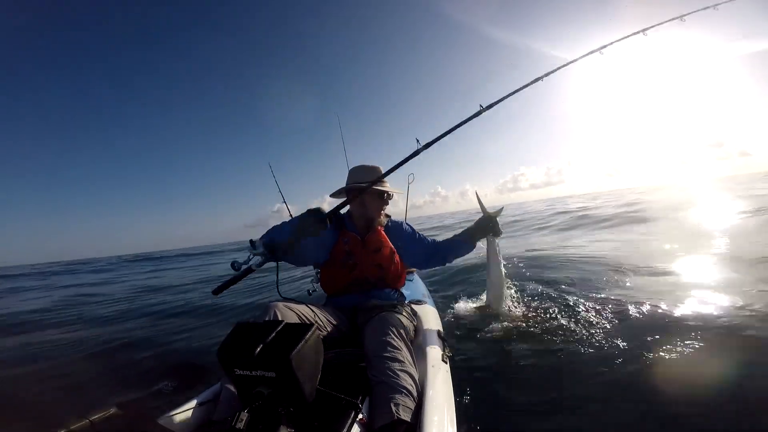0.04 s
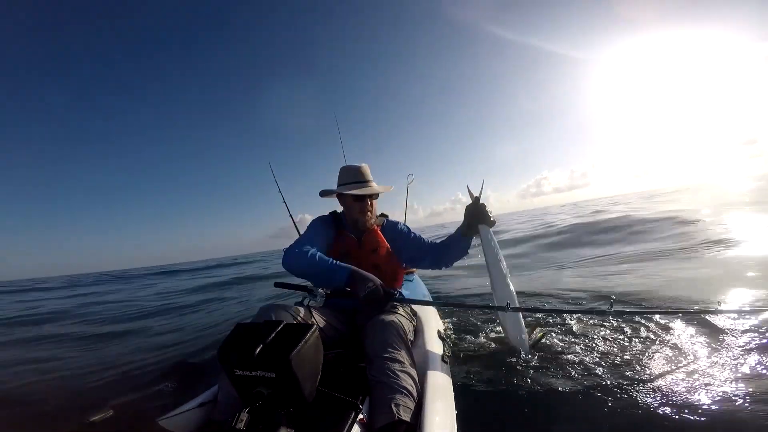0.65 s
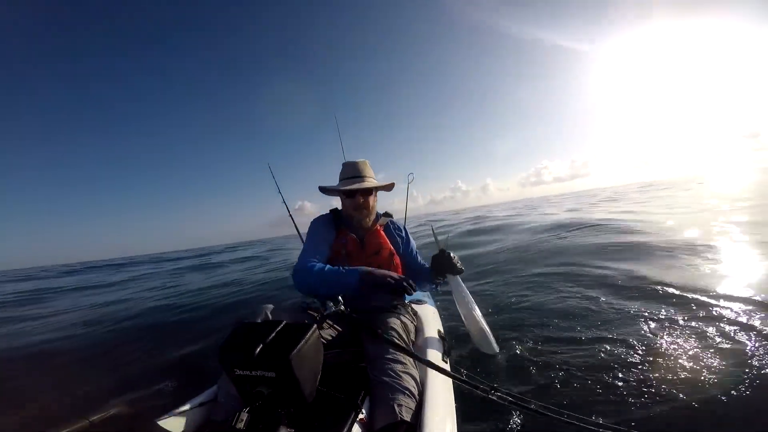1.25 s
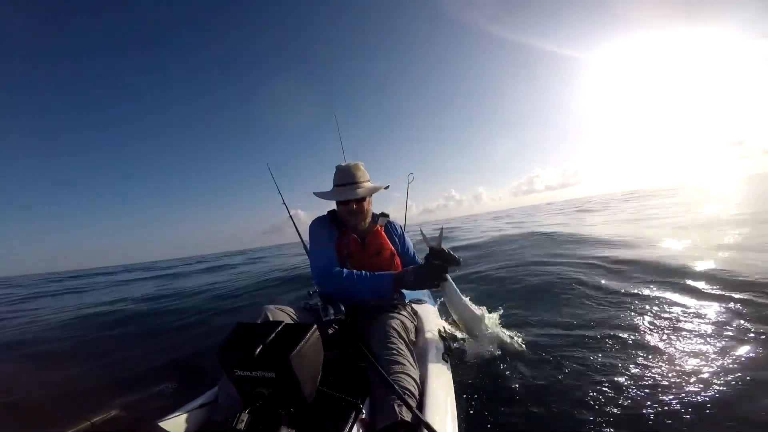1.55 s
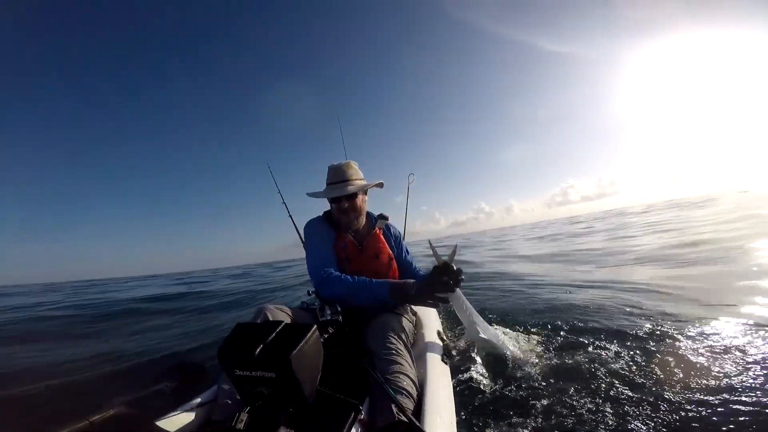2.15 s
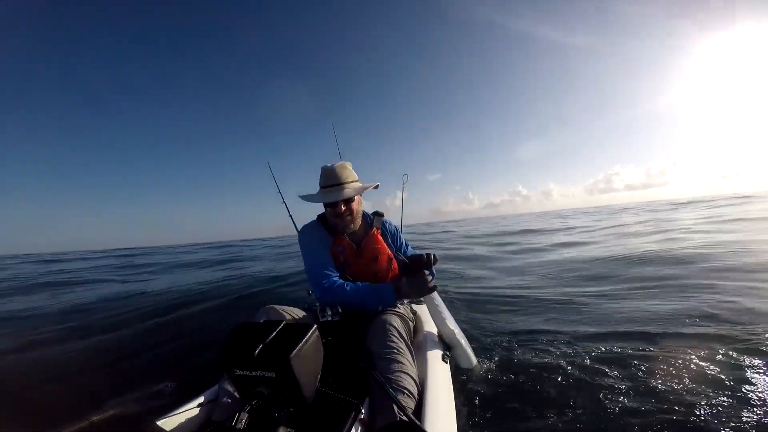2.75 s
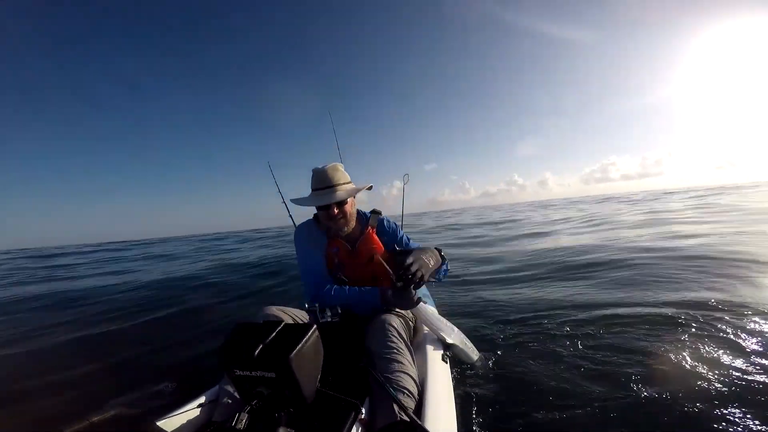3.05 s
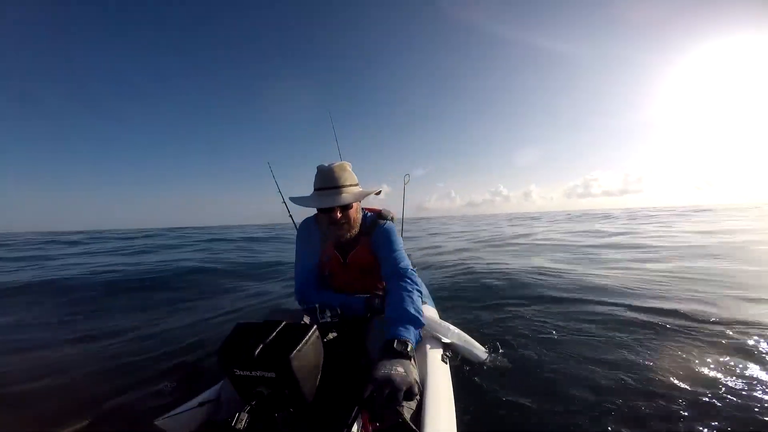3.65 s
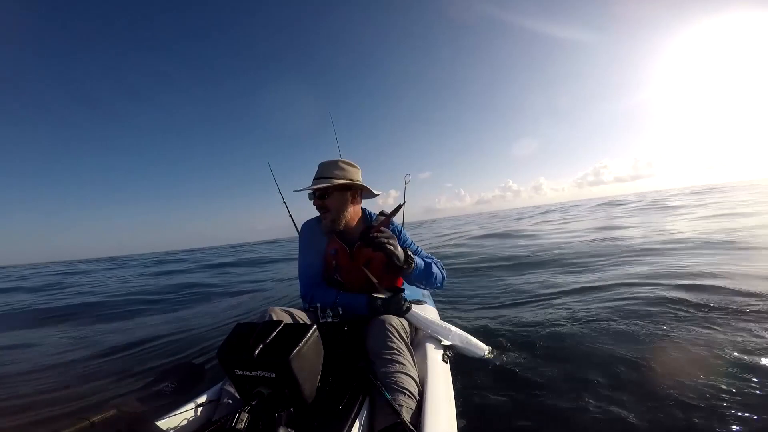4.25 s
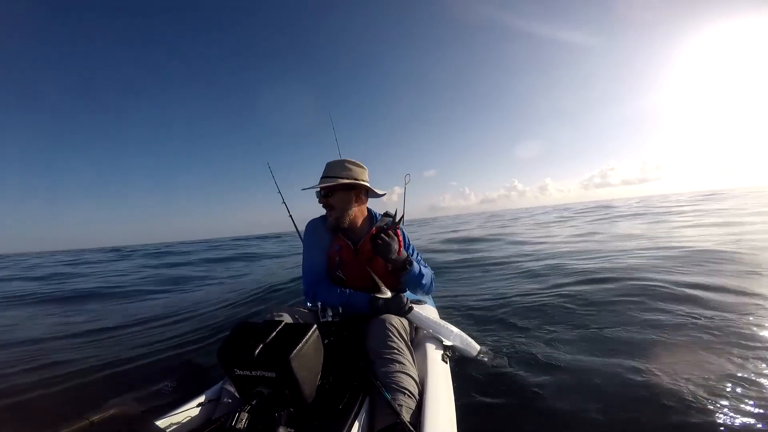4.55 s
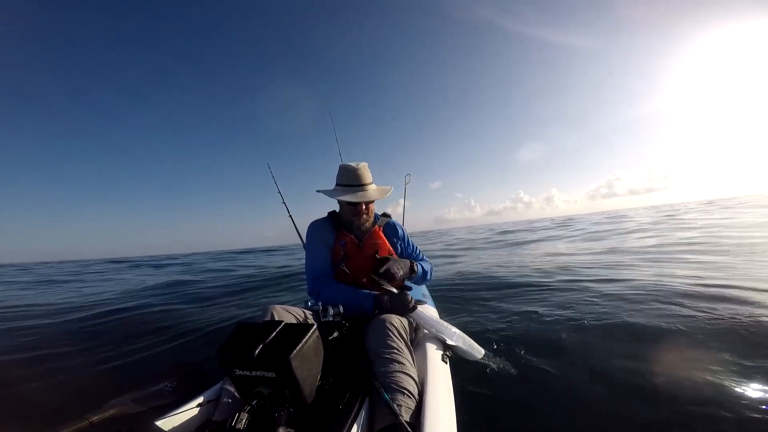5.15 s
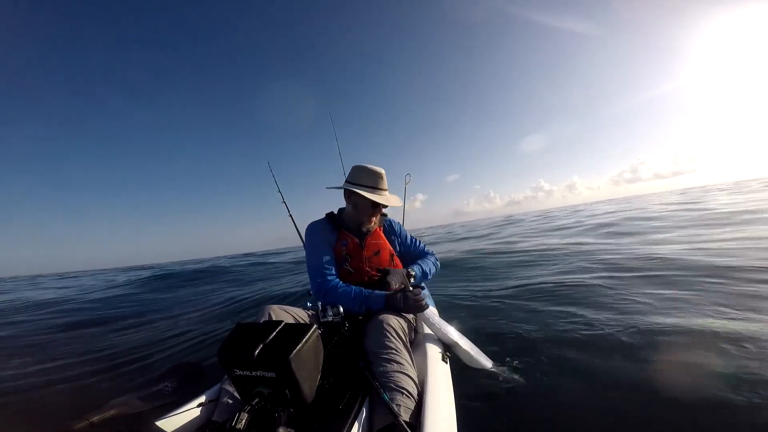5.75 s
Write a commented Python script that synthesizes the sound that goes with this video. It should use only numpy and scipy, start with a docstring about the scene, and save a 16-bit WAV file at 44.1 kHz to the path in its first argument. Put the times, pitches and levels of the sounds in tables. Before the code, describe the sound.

A big fish thrashes and splashes beside a plastic kayak, then thumps against the hollow hull, followed by sharp clicks of pliers.

```python
"""A big fish held by the tail thrashes beside a plastic kayak on a lapping sea, churning up bubbles and spray.
Air pockets plop, thrown water spatters, gear clicks on deck. At 1.5 s the hollow hull cracks, thumps and
booms under more splashing. From about 3 s the fish is hauled against the side in a run of heavy blows;
then gear clicks and pliers scrape on the hook among lighter knocks. It is all heard from the bow, through
two nearly opposed microphone ports and a limiter that ducks after the hardest blows."""
import sys
import numpy as np
from scipy import signal
from scipy.fft import rfft, irfft, next_fast_len
from scipy.io import wavfile
from scipy.ndimage import uniform_filter1d, minimum_filter1d, map_coordinates

SR = 44100
rng = np.random.default_rng(int(sys.argv[2]) if len(sys.argv) > 2 else 0)


def pcm_store(signal):
    """Save signal as 16-bit PCM."""
    levels = np.round(np.clip(np.atleast_2d(signal), -1, 1) * 32767)
    wavfile.write(sys.argv[1], SR, levels.astype(np.int16).T)


N = 265041
TOP_HZ = 15600

# Tone colours: frequency_hz, level_db
GURGLE_SPECTRUM = [(90, -48.5), (160, -4.5), (300, -2), (500, -11), (950, 0.5), (1400, 6.5), (2000, -7.5),
                   (2600, -4), (3300, -41.5), (6000, -47)]  # churned water
SPRAY_SPECTRUM = [(1500, -12.5), (3100, -4), (4200, -0.5), (5800, 6), (7500, 1), (9000, -8.5),
                  (12000, -18.5), (15000, -24)]  # fine drops
RATTLE_SPECTRUM = [(100, -32.5), (200, 4.5), (290, 6.5), (430, 1), (650, -1), (1000, -8.5), (1800, -44),
                   (3000, -81)]  # the shell's dull shudder
CRACK_SPECTRUM = [(900, 5.5), (1400, -15.5), (2100, -14), (2900, -20), (3600, 1.5), (5800, 7.5), (7500, -3),
                  (9000, -8), (12000, -22), (15000, -33)]  # the bright edge of a hard contact
# The left port's lead over the right for sound off the water: frequency_hz, lead_rad
WATER_PHASE = [(5, 0), (140, 0.1), (270, -2.6), (550, -1.95), (1000, -2.55), (1450, -3.1), (1600, -3.2),
               (2200, -3.7), (2620, -3.18), (2900, -3.1), (3400, -5), (4500, -5.9), (5000, -8.8),
               (15000, -9.3)]


def amp(db):
    """Decibels to gain."""
    return np.exp(np.asarray(db) * (np.log(10) / 20))


def unit(x):
    """Scale to rms 1."""
    return x / np.sqrt(np.mean(x ** 2) + 1e-20)


def peaked(x):
    """Scale each channel to peak 1."""
    return x / (np.abs(x).max(axis=-1, keepdims=True) + 1e-12)


def along(points, hz):
    """Read (frequency_hz, value) points on a log axis."""
    point_hz, values = np.transpose(points)
    return np.interp(np.log(hz + 1), np.log(point_hz + 1), values)


def wobble(rate):
    """A smooth random curve, rate knots a second."""
    knots = rng.standard_normal(int(N * rate / SR) + 4)
    return map_coordinates(knots, [np.arange(N) * rate / SR])


def coloured(x, spectrum, size=2048):
    """Causal filter with the gain of (frequency_hz, level_db) points."""
    cepstrum = irfft(np.log(amp(along(spectrum, np.fft.rfftfreq(size, 1 / SR)))))
    cepstrum[1:size // 2] *= 2
    cepstrum[size // 2 + 1:] = 0
    impulse = irfft(np.exp(rfft(cepstrum)))
    return signal.fftconvolve(x, impulse[None], axes=1)[:, :x.shape[1]]


def shifted(spectrum, peak_hz):
    """Transpose a spectrum so that it peaks at peak_hz."""
    own_hz = max(spectrum, key=lambda point: point[1])[0]
    return [(hz * peak_hz / own_hz, db) for hz, db in spectrum]


def noise(spectrum):
    """Two unrelated coloured noises of rms 1."""
    return unit(coloured(rng.standard_normal((2, N)), spectrum))


def burst(t, spectrum, t60, attack):
    """Two short coloured noise hits of peak 1; times in seconds."""
    fade = amp(-60 * t / t60) * (1 - np.exp(-t / attack))
    return peaked(coloured(rng.standard_normal((2, len(t))) * fade, spectrum))


def swell(start_s, length_s, attack_s, fall_db_per_s, tail_db, tail_db_per_s):
    """Power envelope of one push: attack, hold, then a quick fall into a faint slow tail."""
    t = np.arange(N) / SR - start_s
    after = np.maximum(t - length_s, 0)
    fall_db = np.maximum(-fall_db_per_s * after, tail_db - tail_db_per_s * after)
    return (np.clip(t / attack_s, 0, 1) * amp(fall_db)) ** 2


def add(track, start_s, sound):
    """Mix a sound into a track."""
    start = max(0, round(start_s * SR))
    track[:, start:start + sound.shape[1]] += sound[:, :N - start]


def ports(pair, phase):
    """Row 0 reaches both ports, phase-shifted on the left; row 1 is scatter that only the left gets."""
    left_level = [(45, 0), (110, 1.5), (280, 6.5), (620, 1.5), (1050, -3.8), (1500, -0.7), (2350, -6.5),
                  (2630, -0.4), (2880, 0.4), (3150, 5.5), (3600, -0.5), (4000, -1.5), (4700, -14),
                  (5200, -14), (6000, -22), (8000, -12.5), (14000, -7)]  # left port against right: frequency_hz, level_db
    port_likeness = [(45, 1), (110, 0.65), (170, 0.75), (300, 0.92), (480, 0.8), (800, 0.98), (1550, 0.99),
                     (2300, 0.82), (2620, 1), (2900, 1), (3200, 0.7), (4000, 0.85), (4700, 0.5),
                     (8000, 0.35), (12000, 0.25)]  # how alike they sound: frequency_hz, likeness (0-1)
    size = next_fast_len(N + SR // 2)
    hz = np.fft.rfftfreq(size, 1 / SR)
    direct, scattered = rfft(pair, size)
    alike = np.clip(along(port_likeness, hz), 0, 1)
    left = alike * direct * np.exp(1j * along(phase, hz)) + np.sqrt(1 - alike ** 2) * scattered
    return irfft(np.array([left * amp(along(left_level, hz)), direct]), size)[:, :N]


def sea():
    """Small waves lap along the boat under a faint even hiss."""
    wave_spectrum = [(60, -28), (100, -43.5), (145, 4.5), (330, 4.5), (600, -7), (1200, -2.5), (2800, -26),
                     (4200, -44), (5800, -15.5), (8000, -21), (10500, -20), (15000, -67)]  # lapping water: frequency_hz, level_db
    lapping = noise(wave_spectrum) * amp(-49 + 1.9 * wobble(2.76) + 3.04 * wobble(21))
    hiss = noise([(60, -18), (150, 9), (400, 8), (2500, 2.5), (9000, -5.5), (11000, -9), (15000, -18)])
    return ports(lapping, WATER_PHASE) + amp(-55.5) * hiss


def bubble(t, hz, cycles, rise):
    """A bubble rings for some cycles and climbs in pitch as it nears the surface."""
    age = t * hz / cycles
    glide = 1 + rise * np.minimum(age, 2) / 2
    return np.sin(2 * np.pi * hz * t * glide) * np.exp(-2 * age) * (1 - np.exp(-10 * age))


def bubbles(per_s, centre_hz, spread, cycles, rise, size_db, samples):
    """Two swarms of bubbles of scattered pitch and strength, rms 1."""
    swarms, count = [], int(per_s * N / SR)
    for _ in range(2):
        start = rng.integers(0, N, (count, 1))
        hz = np.minimum(centre_hz * np.exp(spread * rng.standard_normal((count, 1))), TOP_HZ)
        strength = amp(size_db * np.minimum(rng.exponential(size=(count, 1)), np.pi))
        rings = strength * bubble(np.arange(samples) / SR, hz, cycles, rise)
        swarms.append(np.bincount((start + np.arange(samples)).ravel(), rings.ravel(), N)[:N])
    return unit(np.array(swarms))


def splash():
    """Each stroke churns up clumps of bubbles and throws drops that patter back as spray."""
    strokes = [(0.0, 0.076, -27, -42.5), (0.108, 0.12, -29.5, -39), (0.255, 0.22, -35.5, -41.5),
               (0.692, 0.028, -33.5, -47.5), (0.795, 0.023, -41, -46), (0.96, 0.021, -44.5, -51.5),
               (1.463, 0.1, -27, -40), (1.653, 0.12, -25, -34), (1.818, 0.22, -24, -30.5),
               (2.137, 0.24, -30, -41)]  # the fish beating the water: start_s, length_s, gurgle_db, spray_db
    shape = dict(attack_s=0.015, tail_db_per_s=22.5)  # the tail is water running off
    churned, thrown = np.zeros((2, N))
    for start_s, length_s, gurgle_db, spray_db in strokes:
        churned += amp(gurgle_db) ** 2 * swell(start_s, length_s, fall_db_per_s=94.5, tail_db=-25, **shape)
        thrown += amp(spray_db) ** 2 * swell(start_s, length_s, fall_db_per_s=73.5, tail_db=-10.5, **shape)
    air = bubbles(per_s=250, centre_hz=1080, spread=.35, cycles=13, rise=.15, size_db=4.5, samples=1024)
    glugs = bubbles(per_s=35, centre_hz=880, spread=.35, cycles=11, rise=.12, size_db=3, samples=3072)
    drops = bubbles(per_s=800, centre_hz=4600, spread=.45, cycles=9, rise=.12, size_db=6, samples=256)
    surge_db = 1.4 * wobble(40.09)  # each lump of falling water feeds gurgle and spray alike
    wash = noise(GURGLE_SPECTRUM) * amp(1 + 2.2 * wobble(70))
    fizz = noise(SPRAY_SPECTRUM) * amp(1.5 + 1.3 * wobble(300))
    gurgle = unit(air + amp(-14.5) * glugs + wash)
    spray = unit(unit(coloured(drops, SPRAY_SPECTRUM)) + fizz)
    return amp(surge_db) * (np.sqrt(churned) * gurgle + np.sqrt(thrown) * spray)


def plops():
    """An air pocket closes with a wet splat and rings as one large bubble; smaller ones tear off."""
    pockets = [(0.006, -9, 957), (0.007, -17, 617), (0.034, -14.5, 617), (0.055, -9, 1210),
               (0.135, -16, 915), (0.203, -10, 1280), (0.322, -18, 887), (0.383, -20.5, 1055),
               (0.446, -18.5, 913), (0.529, -21.5, 1220), (0.635, -26, 1010), (0.688, -16.5, 1090),
               (0.728, -21.5, 2070), (0.846, -12, 1356), (0.955, -27.5, 703), (1.556, -1, 1147),
               (1.57, -14, 615), (1.604, -2, 1074), (1.653, -4.5, 1060), (1.684, -12, 806),
               (1.708, -5.5, 1030), (1.778, -6, 1400), (1.877, -9.5, 906), (2.016, -16, 593),
               (2.05, -15.5, 738), (2.068, -5.5, 983), (2.279, -27, 830), (2.301, -21.5, 1055),
               (2.385, -12.5, 980), (2.53, -32, 448), (2.765, -27, 1790), (2.82, -33.5, 695),
               (2.832, -23, 930), (3.315, -29, 1970)]  # the largest air pockets: start_s, level_db, nominal_pitch_hz
    torn_spread_s = 0.02
    track, t = np.zeros((2, N)), np.arange(SR // 8) / SR
    for start_s, db, hz in pockets:
        ring = peaked(bubble(t, hz * .95, cycles=10.9, rise=rng.uniform(0.073, 0.198)))
        splat = burst(t, GURGLE_SPECTRUM, t60=0.05, attack=0.00046)
        add(track, start_s, amp(db - 8.5) * ring + amp(db - 12) * splat)
        for delay, pitch in rng.random((3, 2)):
            torn = peaked(bubble(t, hz * 2 ** (pitch - .5), cycles=10.8, rise=0.14))
            add(track, start_s + torn_spread_s * delay, amp(db - 17) * torn[None])
    return track


def spatters():
    """A lump of thrown water slaps down: a short bright splat and a few tiny ringing bubbles."""
    landings = [(0.163, -23), (0.474, -24.5), (1.596, -19), (1.653, -28), (1.709, -13.5), (1.725, -15.5),
                (1.758, -27), (1.78, -24.5), (1.846, -23), (1.965, -25), (1.931, -15.5), (2.032, -16),
                (2.154, -24), (2.24, -23.5), (2.271, -23), (2.315, -21), (2.349, -27)]  # water hitting the surface: start_s, level_db
    ping_hz, ping_spread_s = 5020, 0.013
    track, t = np.zeros((2, N)), np.arange(SR // 10) / SR
    for start_s, db in landings:
        slap = burst(t, SPRAY_SPECTRUM, t60=0.017, attack=0.0005)
        slosh = burst(t, GURGLE_SPECTRUM, t60=0.039, attack=0.0005)
        add(track, start_s, amp(db) * (slap + slosh))
        for delay, pitch in rng.random((4, 2)):
            ping = peaked(bubble(t, ping_hz * 2 ** (pitch - .5), cycles=25, rise=0.075))
            add(track, start_s + ping_spread_s * delay, amp(db - 16) * ping[None])
    return track


def clicks_and_scrapes():
    """Hard contacts click, crack or scrape: a bright tick, a rough damped ring and a tap on the shell."""
    # Sharp clicks and cracks: gear on the deck, and the bright edge of the hardest hull blows
    sharp_hits = [(0.767, -17.5, 3380, -34, 710), (0.863, -14, 5140, -10, 462),
                  (1.479, -7.5, 4320, -8, 1200), (1.551, -13.5, 3950, -8, 1130),
                  (3.06, -29, 6500, -53, 700), (3.302, -30, 4050, -27.5, 1910),
                  (3.4908, -14, 2360, -3.5, 1700), (3.569, -21.5, 6070, -17, 710),
                  (4.598, -9.5, 4330, -12, 650), (4.639, -14, 2390, -11.5, 1330),
                  (4.912, -46, 2500, -22, 1400), (5.036, -11.5, 3520, -8, 626),
                  (5.0668, -10, 3870, -16.5, 885), (5.1855, -15, 4680, -19, 795),
                  (5.3661, -17.5, 4260, -24.5, 1120), (5.544, -16.5, 4320, -8.5, 758),
                  (5.8047, -20.5, 4000, -20, 514)]  # start_s, ring_db, ring_hz, tap_db, tap_hz
    hook_scrapes = [(4.583, -34.5), (5.011, -35.5), (5.243, -28.5), (5.46, -43.5), (5.573, -38),
                    (5.667, -32.5)]  # pliers on the hook: start_s, ring_db
    tap_spectrum = [(90, -57.5), (250, -35), (500, 0), (680, 9), (830, 3), (1400, -9), (2200, -17),
                    (4000, -35.5)]  # the tapped shell: frequency_hz, level_db
    click_t60_s, scrape_t60_s = 0.017, 0.12
    scrape_hz, scrape_tap_hz = 4156, 686
    clicks = [(*row, click_t60_s) for row in sharp_hits]
    scrapes = [(s, db, scrape_hz, db + 6.5, scrape_tap_hz, scrape_t60_s) for s, db in hook_scrapes]
    track, t = np.zeros((2, N)), np.arange(SR // 6) / SR
    for start_s, ring_db, hz, tap_db, tap_hz, t60 in clicks + scrapes:
        resonance = [(hz * 0.15, -40), (hz * 0.75, -15), (hz, 0),
                     (hz * 1.68, -15), (hz * 3.9, -36), (TOP_HZ, -60)]
        rasp = burst(t, resonance, t60, attack=0.0004)
        rasp += amp(-33) * burst(t, resonance, t60=0.047, attack=0.0013)
        tone = np.sin(2 * np.pi * hz * t) * amp(-60 * t / t60) * (1 - np.exp(-t / 0.0005))
        ring = amp(-4.5) * rasp + amp(-7) * tone
        tick = burst(t, CRACK_SPECTRUM, t60, attack=0.00028)
        tick += amp(-24) * burst(t, CRACK_SPECTRUM, t60=0.065, attack=0.0019)
        tap = burst(t, shifted(tap_spectrum, tap_hz), t60, attack=0.0011)
        tap += amp(-20.5) * burst(t, RATTLE_SPECTRUM, t60=0.013, attack=0.0026)
        add(track, start_s, amp(ring_db - 2.5) * ring + amp(ring_db - 5.5) * tick + amp(tap_db - 6) * tap)
    return track


def bending_wave(t, spectrum):
    """A pulse runs through the shell: the highs arrive first, then a scatter of reflections."""
    travel_s = 0.002233  # to the bow, at 1 kHz
    echo_db, echo_t60_s = -3.5, 0.069
    echoes = rng.standard_normal((2, len(t))) * amp(-60 * t / echo_t60_s) * (1 - np.exp(-t / 0.0023))
    arrivals = (t == 0) + amp(echo_db) * echoes / np.linalg.norm(echoes[0])
    size = 2 * len(t)
    lag_rad = 4 * np.pi * travel_s * np.sqrt(1000 * np.fft.rfftfreq(size, 1 / SR))
    dispersed = irfft(rfft(coloured(arrivals, spectrum), size) * np.exp(-1j * lag_rad))
    return peaked(dispersed[:, :len(t)])


def hull():
    """A blow cracks, knocks and thumps a panel, whose pitch sags as it relaxes; then the hull rings."""
    # Hits on the hull: start_s, thump_db, panel_hz, knock_db, knock_hz (higher for harder contact)
    blows = [(1.479, -0.5, 248.5, -1.5, 720), (1.523, -11.5, 172, -13, 550), (1.571, -7.5, 72.5, -11, 560),
             (1.603, -8.5, 103.5, -3, 640), (2.633, -19.5, 141.4, -23, 566), (3.130, -15, 224, -18, 780),
             (3.15, -13, 238, -20.5, 650), (3.158, -12.5, 86, -13.5, 770), (3.172, -7, 93, -13.5, 750),
             (3.451, -23, 154, -27, 736), (3.489, 1, 128, 11, 667), (3.53, -5, 251.4, -30, 497),
             (3.571, -6.5, 118, -17.5, 650), (3.613, -2, 251, -7.5, 634), (3.6405, 4.5, 142, 3.5, 852),
             (3.648, 2, 267.5, -14, 746), (3.668, 1, 144.7, -0.5, 780), (3.701, -25, 283, -14, 930),
             (3.71, 1.5, 133, -14.5, 640), (4.116, -24, 278, -18.5, 756), (4.248, -22.5, 90.5, -31.5, 570),
             (4.493, -31.5, 287, -28, 600), (4.599, -15.5, 279, -20, 634), (4.612, -20, 106, -30, 500),
             (4.64, -19.5, 281, -11, 965), (4.913, -27.5, 273, -21.5, 720), (5.564, -26, 276, -38, 500)]
    modes = [(97.6, -2, 0.45), (112.4, -1.5, 0.27), (147.5, 0, 0.29), (179.8, -0.5, 0.23),
             (227.8, -3.5, 0.13), (261.6, -0.5, 0.187), (295.2, 1.5, 0.14), (348.4, -2.5, 0.27)]  # panel resonances: pitch_hz, level_db, t60_s
    knock_spectrum = [(150, -20.5), (330, -1.5), (550, -3), (850, 0), (1250, -7), (1700, -26),
                      (2200, -35.5), (3000, -48), (6000, -90)]  # struck plastic: frequency_hz, level_db
    thump_s, pitch_bend, sag_s = 0.03, 0.18, 0.016
    track, t = np.zeros((2, N)), np.arange(SR // 3) / SR
    mode_hz, mode_db, t60 = np.transpose(modes)[:, :, None]  # one row per mode
    for start_s, thump_db, panel_hz, knock_db, knock_hz in blows:
        octaves_away = np.abs(np.log2(mode_hz / panel_hz))
        weight_db = mode_db - 9 * octaves_away + rng.normal(0, 3.8, mode_hz.shape)
        detune = rng.normal(1, 0.014, mode_hz.shape)
        phase = 2 * np.pi * (mode_hz * t * detune + rng.random((2, len(modes), 1)))
        panels = (amp(weight_db - 60 * t / t60) * np.sin(phase)).sum(axis=1)
        body = peaked(panels * (1 - np.exp(-t / 0.0049)))  # slow bending waves take time to fill the hull
        turns = np.cumsum(panel_hz * (1 + pitch_bend * np.exp(-t / sag_s))) / SR
        thump = peaked(np.sin(2 * np.pi * turns) * (1 - np.exp(-t / 0.0029)) * np.exp(-(t / thump_s) ** 2))
        knock = bending_wave(t, shifted(knock_spectrum, knock_hz))
        knock += amp(-12) * burst(t, RATTLE_SPECTRUM, t60=0.13, attack=0.0057)
        crack = burst(t, CRACK_SPECTRUM, t60=0.052, attack=0.0006)
        crack += amp(-14.5) * burst(t, CRACK_SPECTRUM, t60=0.07, attack=0.0023)
        strike = amp(knock_db) * (knock + amp(-32) * crack)
        add(track, start_s, amp(thump_db) * (amp(-5) * body + amp(-10) * thump) + strike)
    return track


def boom():
    """Each heave sets the boat humming on its lowest mode over a dull rumble."""
    heaves = [(1.511, 0.15, -15), (1.696, 0.14, -13), (2.655, 0.11, -25.5), (3.126, 0.32, -22.5),
              (3.478, 0.34, -22), (4.24, 0.076, -30.5)]  # pushes that flex the whole boat: start_s, length_s, level_db
    mode_hz = 42
    shape = dict(attack_s=0.051, fall_db_per_s=176, tail_db=-18, tail_db_per_s=10)  # tail: faint rocking
    power = sum(amp(db) ** 2 * swell(start_s, length_s, **shape) for start_s, length_s, db in heaves)
    level_db = 10 * np.log10(power + 1e-12)
    phase = 2 * np.pi * np.cumsum(mode_hz * (1 + 0.023 * wobble(15))) / SR
    hum = unit(np.array([np.sin(phase), np.cos(phase)])) * amp(0.52 * wobble(14))
    rumble_spectrum = [(18, 7.5), (40, 4.5), (65, -0.5), (100, 2), (170, -5), (400, -52.5)]  # the boat's low end: frequency_hz, level_db
    rumble_db = np.minimum(level_db - 5.5, 0.19 * level_db - 32)  # strong rocking feeds mostly the mode
    return amp(level_db - 5) * hum + amp(rumble_db) * noise(rumble_spectrum)


def scene():
    """Everything on and beside the boat, heard from the bow."""
    deck_phase = [(5, 1.5), (45, 0.36), (150, 1.77), (260, -2.5), (450, -3), (900, -2.5), (1300, -2.5),
                  (1800, -2), (3000, -2), (4300, -8.5), (5400, -14), (15000, -12.5)]  # the left port's lead for sound off the deck: frequency_hz, lead_rad
    water = ports(splash() + plops() + spatters(), WATER_PHASE)
    boat = ports(hull() + boom() + clicks_and_scrapes(), deck_phase)
    return water + boat + sea()


def record(dry):
    """A limiter ducks at once on loud peaks, recovers part quickly and the rest slowly; then a top cut."""
    ceiling_db, quick_db_per_s, slow_db_per_s, slow_share = -2, 49, 12, 0.7429
    over_db = np.maximum(20 * np.log10(np.abs(dry).max(axis=0) + 1e-9) - ceiling_db, 0)
    ahead_db = -minimum_filter1d(-over_db, size=128)
    t = np.arange(N) / SR
    release = lambda db, db_per_s: np.maximum.accumulate(db + db_per_s * t) - db_per_s * t
    duck_db = np.maximum(release(ahead_db, quick_db_per_s), release(slow_share * ahead_db, slow_db_per_s))
    limited = dry * amp(-uniform_filter1d(duck_db, size=128))
    size = next_fast_len(N + SR // 2)
    passband = np.fft.rfftfreq(size, 1 / SR) < TOP_HZ
    return irfft(rfft(limited, size) * passband, size)[:, :N]


dry = scene()
out = record(dry)
pcm_store(out)
```